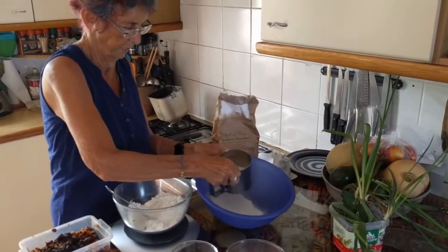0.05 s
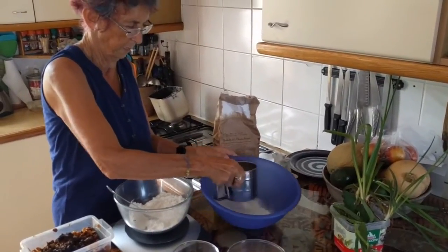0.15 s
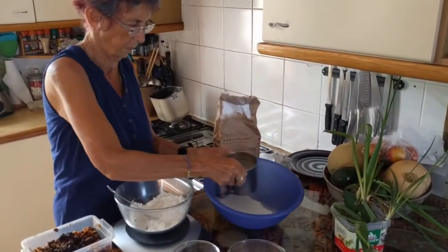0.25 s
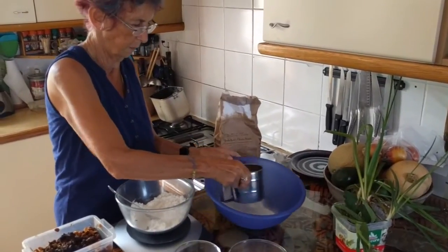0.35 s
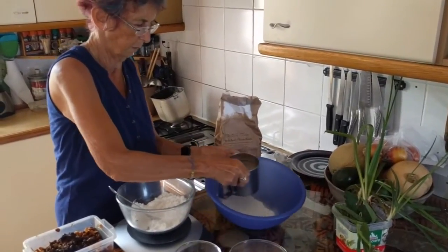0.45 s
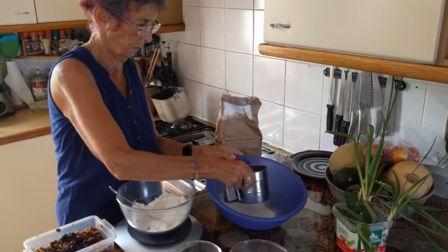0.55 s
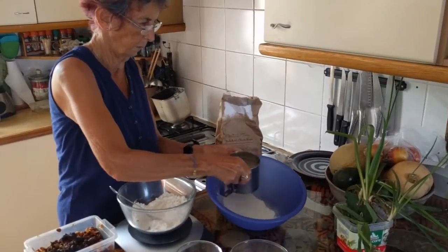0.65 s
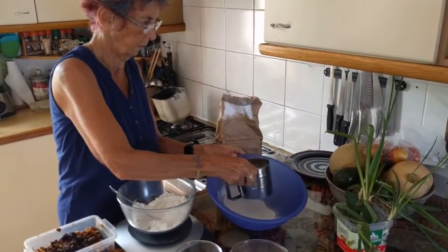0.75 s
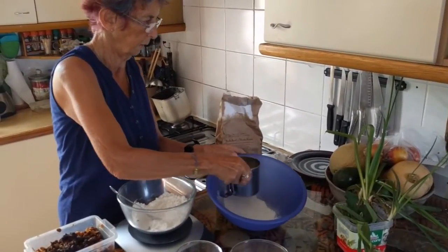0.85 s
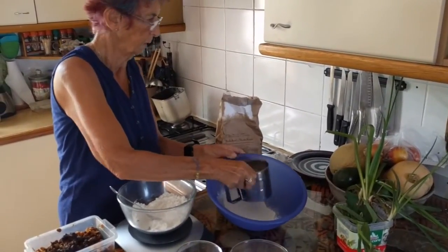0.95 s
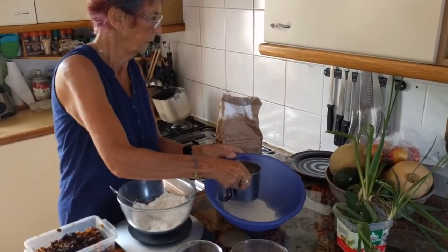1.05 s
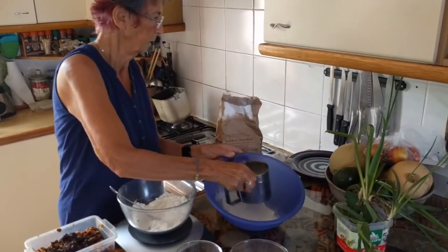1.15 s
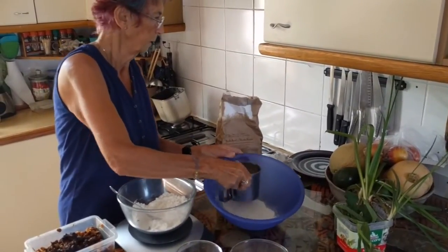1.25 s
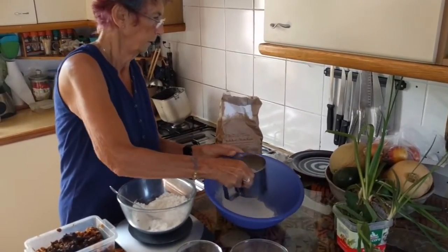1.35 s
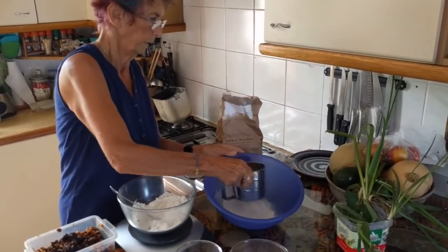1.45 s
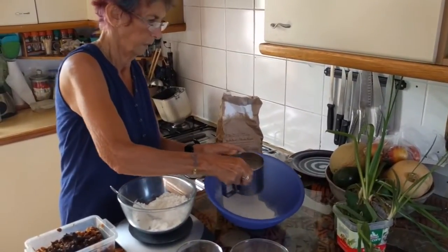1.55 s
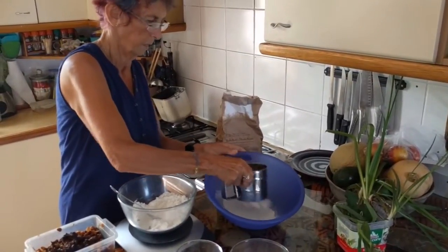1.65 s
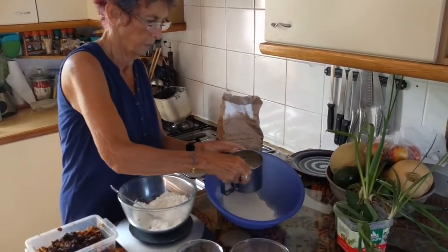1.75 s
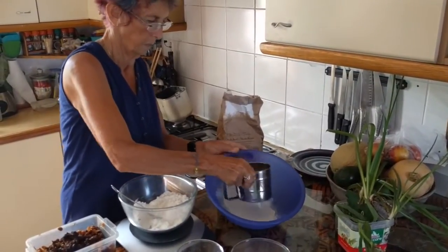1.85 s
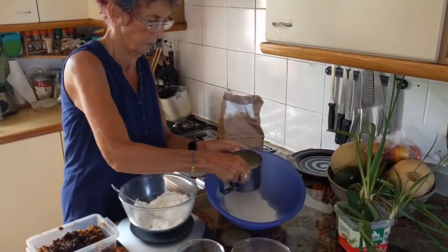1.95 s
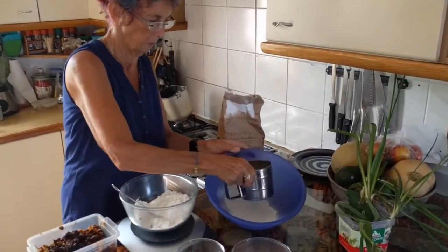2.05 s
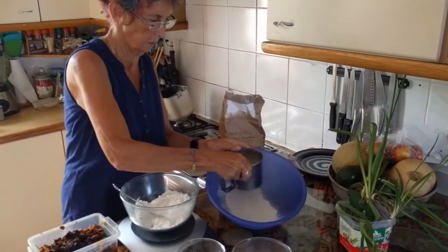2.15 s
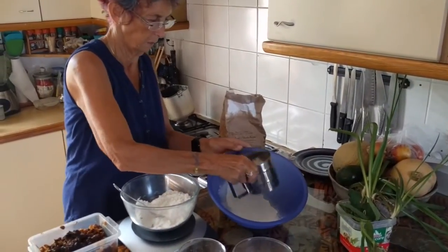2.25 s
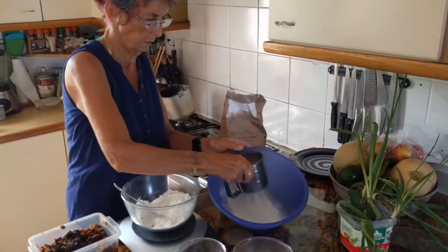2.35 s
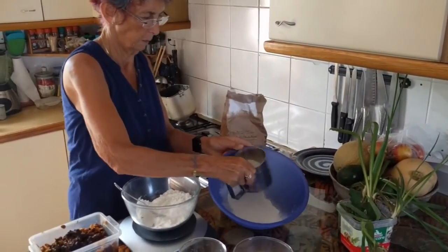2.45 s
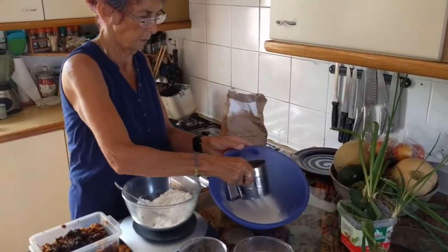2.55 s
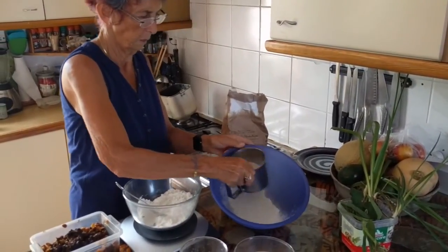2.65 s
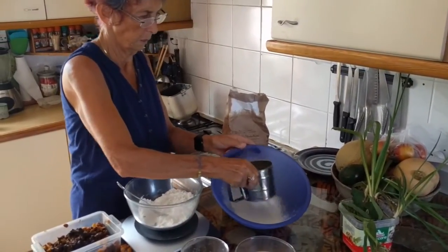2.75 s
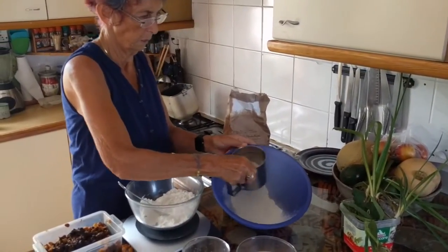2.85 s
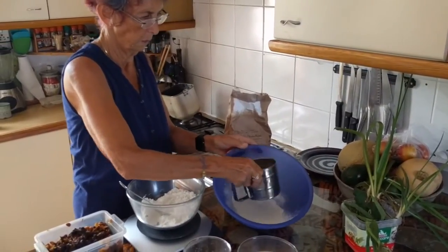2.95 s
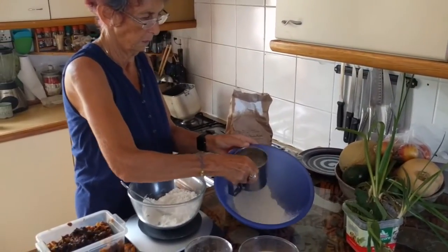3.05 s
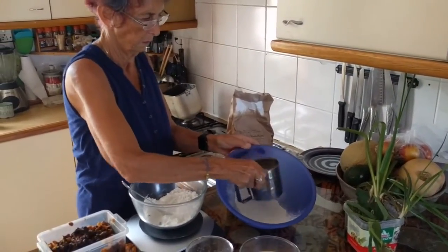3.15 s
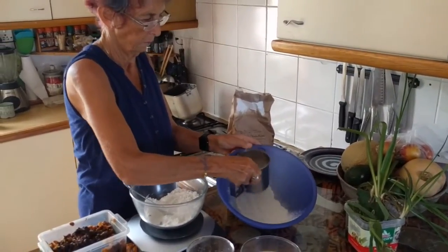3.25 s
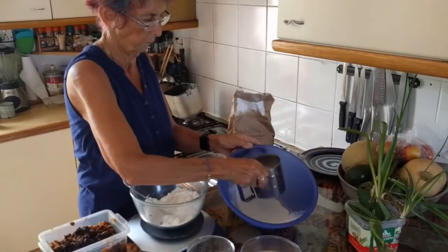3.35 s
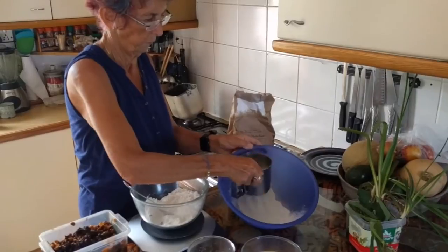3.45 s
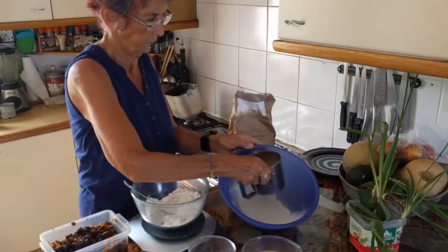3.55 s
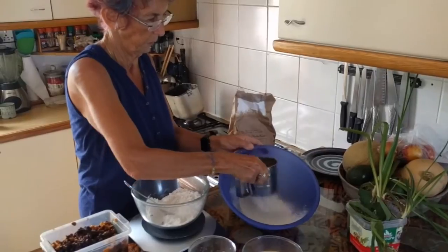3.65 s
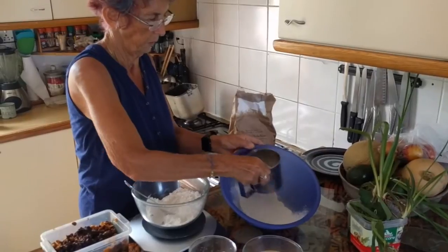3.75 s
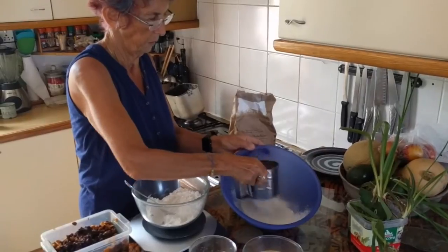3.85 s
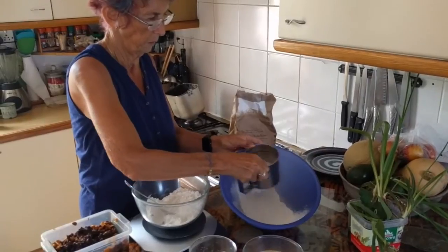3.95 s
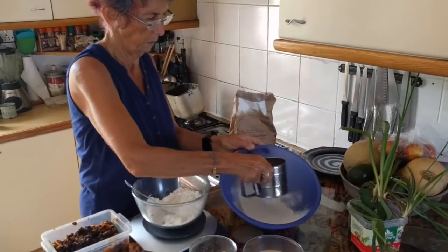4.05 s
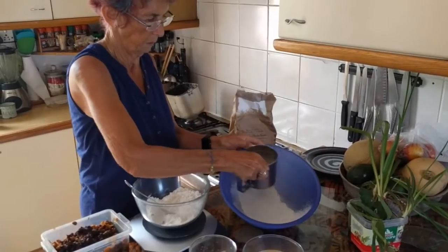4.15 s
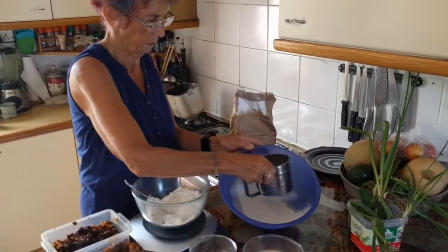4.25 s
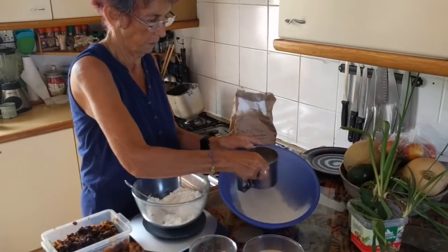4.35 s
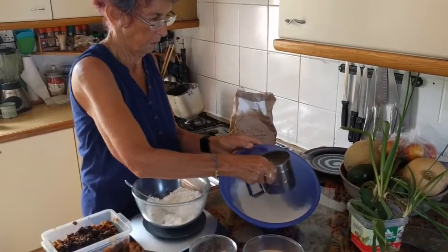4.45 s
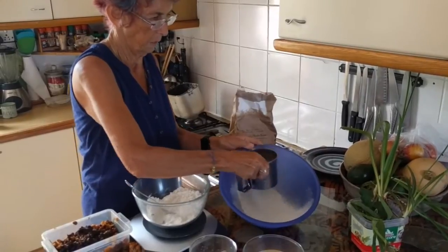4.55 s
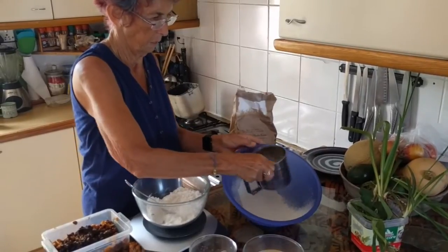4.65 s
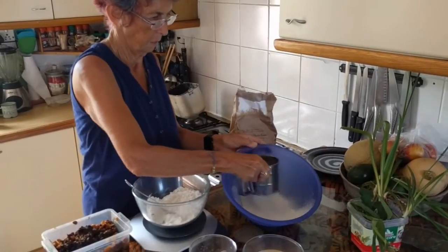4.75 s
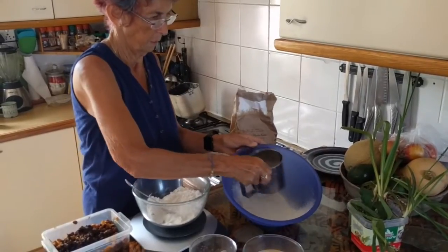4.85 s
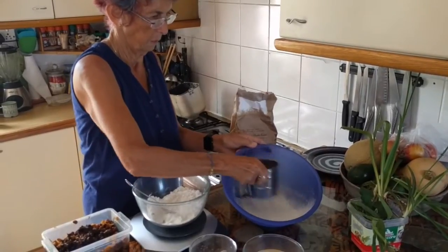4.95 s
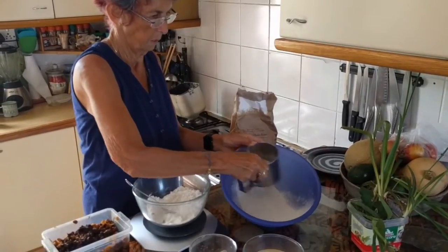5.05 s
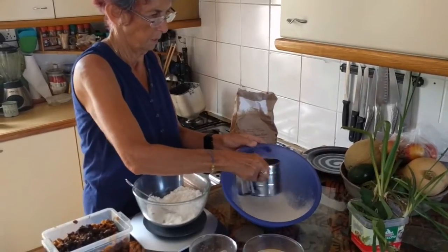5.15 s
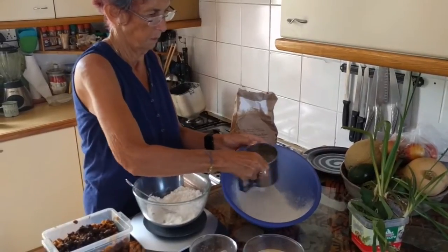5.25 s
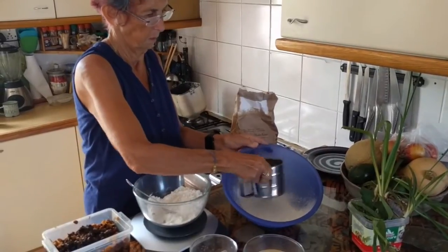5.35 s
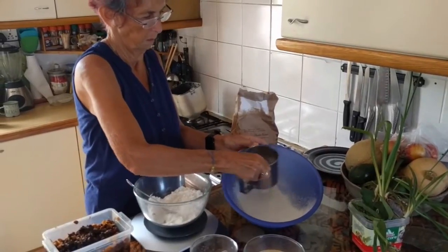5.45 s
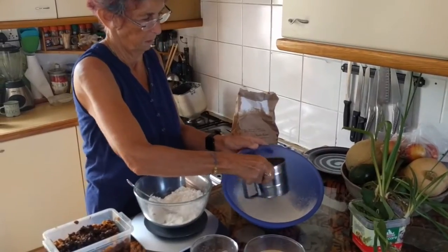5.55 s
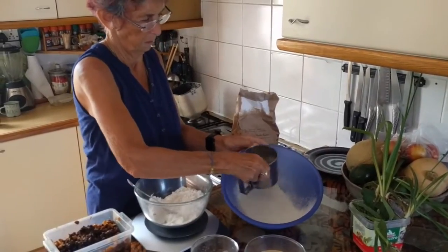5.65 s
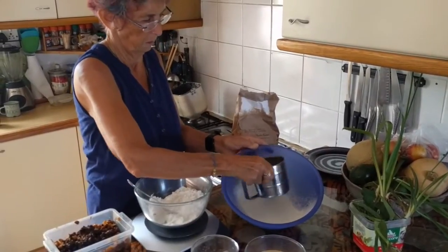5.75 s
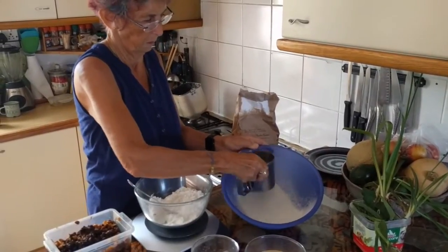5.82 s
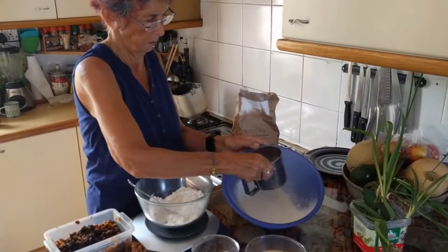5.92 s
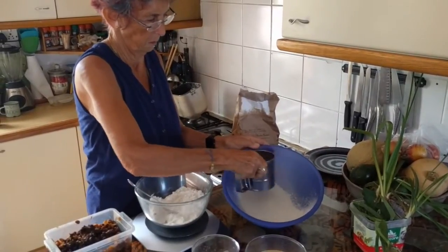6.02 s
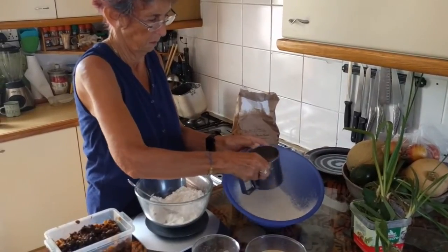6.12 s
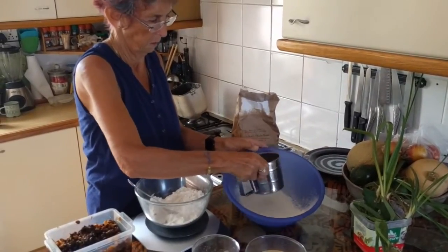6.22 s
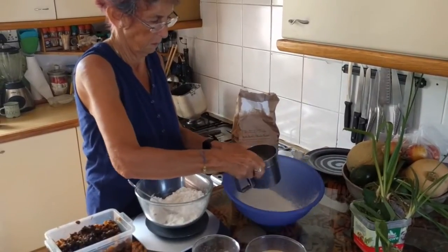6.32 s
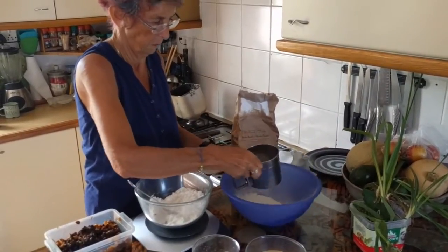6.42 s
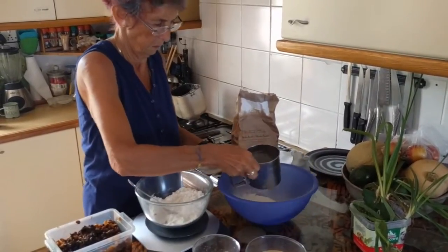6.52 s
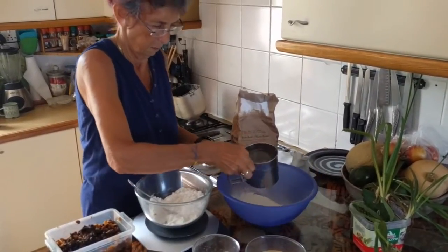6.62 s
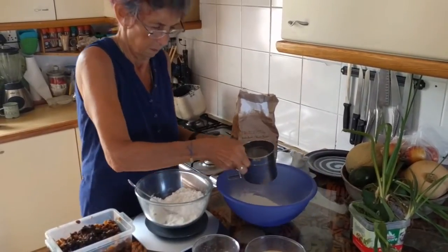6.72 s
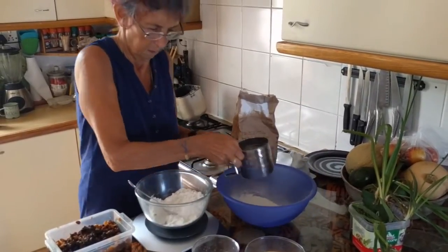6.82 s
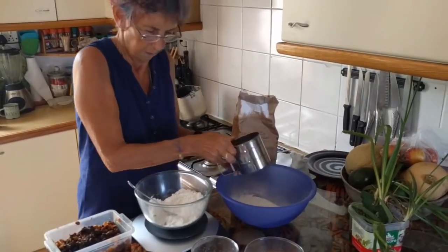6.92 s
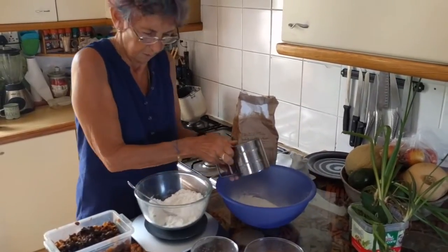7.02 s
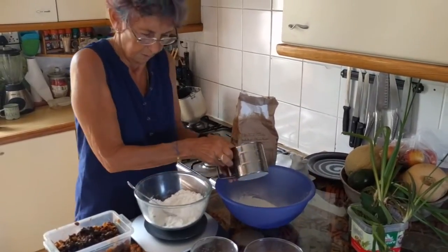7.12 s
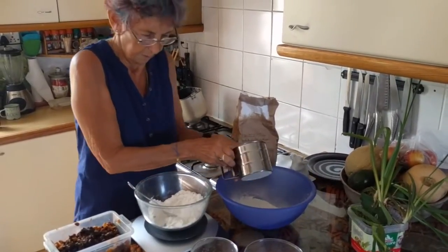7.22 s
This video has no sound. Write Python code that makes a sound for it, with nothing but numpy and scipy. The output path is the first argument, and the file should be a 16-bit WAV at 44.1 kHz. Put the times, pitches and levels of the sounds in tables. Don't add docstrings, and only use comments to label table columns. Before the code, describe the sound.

Rapid hollow clacks of a metal can against a plastic bowl in a tiled kitchen, ending with a set-down thud and light tinny taps.

```python
import sys
import numpy as np
from scipy import signal
from scipy.fft import rfft, irfft, next_fast_len
from scipy.io import wavfile
from scipy.ndimage import uniform_filter1d

SR = 44100
rng = np.random.default_rng(int(sys.argv[2]) if len(sys.argv) > 2 else 0)


def store_wav(level_fs):
    pcm = np.round(np.clip(np.atleast_2d(level_fs), -1, 1) * 32767)
    wavfile.write(sys.argv[1], SR, pcm.T.astype(np.int16))


def nominal_scale(level):
    x = np.asarray(level, float) / 20
    return 10 ** x


N = 321249


def at_hz(points, hz):
    return np.interp(np.log(hz), np.log(np.array(points)[:, 0]), np.array(points)[:, 1])


def band_pass(x, low_hz, high_hz):
    return signal.sosfilt(signal.butter(2, [low_hz, high_hz], "band", fs=SR, output="sos"), x)


def coloured(colour_db, channels):
    size = next_fast_len(N + SR)
    hz = np.maximum(np.fft.rfftfreq(size, 1 / SR), 10)
    spectrum = rfft(rng.standard_normal((channels, size))) * nominal_scale(colour_db(hz))
    noise = irfft(spectrum, size)[:, :N + SR]
    return noise / np.sqrt(np.mean(noise ** 2) + 1e-20)


def add(out, sound, s):
    at = sample(s)
    out[at:at + len(sound)] += sound[:len(out) - at]


def sample(s):
    return np.round((np.asarray(s) + 1) * SR).astype(int)


def struck(modes, spread_db, contact_s, scale_hz=1):
    mode, level_db, t60 = np.transpose(modes)[:, :, None]
    t = np.arange(SR // 8) / SR
    strength = nominal_scale(level_db + spread_db * rng.standard_normal(mode.shape))
    decay = nominal_scale(-60 * t / t60)
    rings = -np.sum(strength * decay * np.sin(2 * np.pi * mode * scale_hz * t), axis=0)
    rings = signal.lfilter(np.hanning(max(3, int(contact_s * SR) + 3)), 1, rings)
    return rings / np.abs(rings).max()


def snap(low_hz, high_hz, t60):
    t = np.arange(SR // 20) / SR
    burst = band_pass(rng.standard_normal(len(t)) * nominal_scale(-60 * t / t60), low_hz, high_hz)
    return burst / np.abs(burst).max()


# (frequency [Hz], level per Hz [dB])
FLOOR_SPECTRUM = [(25, -19), (55, 6.5), (85, -2), (130, -6), (230, -13), (400, -32), (700, -19),
                  (1000, -20), (1700, -26), (3000, -28), (5000, -30), (9000, -33.5), (16000, -27.5)]
# (time [s], level [dB])
FLOOR_LEVEL = [
    (0, -49.5),
    (5.5, -52.5),
    (6.1, -48),
    (7.28, -47.5),
]
# (frequency [Hz], rms level [dB])
HUM = [(51, -55.5), (67, -53)]


def background():
    level = nominal_scale(np.interp(np.arange(N) / SR, *np.transpose(FLOOR_LEVEL)))
    hum = sum(nominal_scale(level_db) * coloured(lambda hz: -9 * ((hz - tone_hz) / 5.7) ** 2, channels=1)
              for tone_hz, level_db in HUM)
    return level * coloured(lambda hz: at_hz(FLOOR_SPECTRUM, hz), channels=1)[0, SR:] + hum[0, SR:]


# (time [s], peak level [dB])
TICKS = [
    (1.0186, -32.5),
    (2.711, -40),
    (3.99, -36),
    (5.1736, -39),
    (6.3934, -40),
    (6.5516, -36),
    (7.0413, -35),
]


def timer_ticks():
    out = np.zeros(N + SR)
    beats = np.arange(.1482, N / SR, .3072)
    timer = list(zip(beats, -32.5 + 5.5 * rng.standard_normal(len(beats))))
    for s, peak_db in timer + TICKS:
        add(out, nominal_scale(peak_db + 5.5) * snap(low_hz=8400, high_hz=18400, t60=0.00043), s)
    return out


# (time [s], length [s], level [dB])
JINGLES = [
    (6.454, 0.027, -48.5),
    (6.871, 0.049, -47.5),
    (7.09, 0.066, -54),
]
# (frequency [Hz], level [dB], t60 [s])
WHISK = [(4160, -6, 0.028), (4770, -3, 0.031), (6400, -9, 0.025), (7800, -12, 0.017), (10500, 17, .01)]


def whisk():
    out = np.zeros(N + SR)
    for s, length, level_db in JINGLES:
        for share in rng.random(20):
            add(out, nominal_scale(level_db - 2) * struck(WHISK, spread_db=12, contact_s=0), s + share * length)
            rustle = snap(low_hz=5000, high_hz=17000, t60=0.075)
            add(out, nominal_scale(level_db + 2) * rustle, s + share * length)
    return out


# (time [s], force into bowl [dB], force into can [dB], sharpness of edge [dB])
KNOCKS = [(-0.012, -19, -25.5, -30.5), (0.2071, -20, -19.5, -28.5), (0.4087, -18.5, -20, -33.5),
          (0.6281, -19.5, -24.5, -33.5), (0.8386, -17.5, -19, -35), (1.0524, -19.5, -28.5, -32.5),
          (1.2659, -19.5, -29, -32), (1.4973, -16.5, -17.5, -29.5), (1.7111, -17.5, -19.5, -30.5),
          (1.9367, -19, -20.5, -33.5), (2.1509, -17, -18, -33.5), (2.3835, -18, -21, -36),
          (2.598, -18, -25, -34), (2.8212, -16.5, -17.5, -21), (3.0394, -17.5, -20, -29.5),
          (3.2449, -16.5, -19.5, -31), (3.4702, -17.7, -20, -29), (3.6885, -16, -19.5, -32.5),
          (3.89, -15, -17.5, -28), (4.1392, -19.5, -18.5, -26), (4.3376, -12, -18, -16.5),
          (4.5606, -14, -17, -31.5), (4.7934, -19, -20.5, -37), (4.987, -17.5, -22.5, -28),
          (5.2033, -17, -20, -25.5), (5.4133, -18, -19, -22), (5.6262, -15.5, -17.5, -24),
          (5.8344, -17.5, -18.5, -22)]
# (time [s], force into bowl [dB], force into can [dB], sharpness of edge [dB])
OTHER_KNOCKS = [
    (6.0142, -33, -20, -16.5),
    (6.428, -43, -43, -60),
    (6.5877, -20, -27.5, -47),
    (6.662, -29.5, -43, -67),
    (6.716, -30.5, -43, -52.5),
    (7.041, -40, -38.5, -43),
    (7.0758, -45, -32, -48),
]
# (time [s], frequency [Hz])
CAN_PITCH = [(0, 2050), (0.84, 1924), (1.27, 1700), (1.5, 1780), (2.6, 1720), (3.25, 1796), (3.9, 1750),
             (4.14, 1660), (4.5, 1730), (4.95, 1940), (5.4, 1860), (5.83, 2070), (6.015, 1510),
             (6.43, 2065), (7.05, 1690)]


def blows():
    s, bowl_db, can_db, edge_db = np.transpose(KNOCKS + OTHER_KNOCKS)
    clank_db = 1.113 * can_db + 0.42 * edge_db + 19
    can_hz = np.interp(s, *np.transpose(CAN_PITCH))
    return np.array([s, clank_db, bowl_db, can_db, can_hz, edge_db])


def flour_db(s, hz, middle_s=3):
    return -0.5 * (np.minimum(s, 6) - middle_s) * np.log2(hz / 400)


# (frequency [Hz], t60 [s])
KITCHEN_T60 = [(100, 0.19), (260, 0.58), (700, 0.47), (1800, 0.52), (5000, 0.49), (13000, 0.37)]
# (frequency [Hz], level per Hz [dB])
KITCHEN = [(70, -52), (130, -14), (220, -7.5), (450, -12), (800, -19), (1020, -20.5), (1300, -17.5),
           (1700, -14), (2200, -18), (3000, -22), (4000, -27.5), (6000, -27.5), (10000, -22.5),
           (16000, -34)]
# (frequency [Hz], width [Hz], level [dB])
LINGERING = [(134.5, 11.4, 15.5), (232.3, 30, 7), (382, 190, 5), (550, 67, 7.5), (743, 120, 9.5),
             (1490, 23, 6.5), (1607, 59, 7.5), (1862, 122, 10.5), (2158, 35, 6.5), (2400, 46, 4),
             (3380, 62, 6), (3840, 60, 6.5), (7340, 250, 5), (8100, 170, 9)]


def kitchen_colour(hz):
    peaks = [lift_db / (1 + (2 * (hz - at) / width) ** 2) for at, width, lift_db in LINGERING]
    return at_hz(KITCHEN, hz) + sum(peaks)


def kitchen():
    noise = coloured(kitchen_colour, channels=2)
    s, clank_db, bowl_db, can_db, can_hz, crack_db = blows()
    at, now = sample(s), np.arange(N + SR)
    last = np.maximum(np.searchsorted(at, now, "right") - 1, 0)
    since_blow = now - at[last] * (now >= at[0])
    same = .45
    thud_s, thud_db = np.transpose(THUDS)
    out, edges = 0, 70 * 2 ** (np.arange(17) / 2)
    for k, (low, high) in enumerate(zip(edges, np.minimum(edges[1:], 17000))):
        centre = np.sqrt(low * high)
        parts = [at_hz(list(zip([800, 1300, 2100, 3000, 4800, 7000], share)), centre) for share in np.eye(6)]
        blow_db = parts[0] * bowl_db + (parts[1] + parts[2]) * can_db
        blow_db += (parts[3] + parts[4]) * clank_db + parts[5] * crack_db
        tilt_db = 8.5 * np.log2(can_hz / 1800) * np.log2(centre / 1800)
        blow_db += (parts[1] + parts[2] + parts[3]) * tilt_db
        blow_db += parts[0] * flour_db(s, np.clip(centre, 250, 800))
        energy = np.full(N + SR, 1e-18)
        energy[at] = nominal_scale(2 * blow_db)
        energy[sample(thud_s)] = nominal_scale(2 * (thud_db + 1.5)) / (1 + (centre / 500) ** 4)
        dying = nominal_scale(-2 * 60 / (at_hz(KITCHEN_T60, centre) * SR))
        rising = np.exp(-1 / (SR * (0.00033 + 2.04 / centre)))
        envelope = np.sqrt(signal.lfilter([1 - rising], np.convolve([1, -dying], [1, -rising]), energy))
        band = band_pass(noise[k % 2], low, high)
        out = out + envelope * (np.sqrt(same) * band[since_blow + SR // 4] + np.sqrt(1 - same) * band)
    return out


def early_echoes(x):
    t = np.arange(SR // 2) / SR
    scatter = rng.standard_normal(len(t)) * nominal_scale(-60 * t / 0.69) * (1 - np.exp(-t / 0.027))
    return signal.fftconvolve(x, scatter)[:len(x)]


# (time [s], peak level [dB])
THUDS = [(0.041, -29.5), (0.447, -29.5), (0.659, -33.5), (0.871, -30), (1.082, -28), (1.293, -27),
         (1.534, -26), (1.744, -31), (2.628, -31), (3.279, -32), (3.923, -30.5), (4.358, -47), (4.594, -44),
         (5.02, -29), (5.451, -38), (5.662, -44), (6.053, -22.5), (6.111, -30), (6.281, -55), (6.436, -33),
         (6.598, -29), (6.665, -36), (6.727, -30.5), (7.227, -35.5)]
# (frequency [Hz], level [dB], t60 [s])
COUNTER = [(132, 3, 0.31), (222, -10.5, 0.055), (540, -11.5, 0.067)]


def counter_thuds():
    out = np.zeros(N + SR)
    for s, peak_db in THUDS:
        add(out, nominal_scale(peak_db) * struck(COUNTER, spread_db=-6.5, contact_s=0.0016), s)
    return out


# (time [s], peak level [dB])
SQUARE_BLOWS = [
    (4.338, 1),
    (6.015, -1),
]
# (time [s], peak level [dB])
BARE_BLOW = [
    (6.015, -3),
]
# (time [s], peak level [dB])
RIM_BUMPS = [
    (6.05, -20.5),
    (6.43, -33.5),
    (6.718, -28),
    (7.25, -42),
]
# (time [s], peak level [dB])
TIPPED_TAPS = [
    (7.04, -27),
    (7.0765, -20.5),
]
# (frequency [Hz], level [dB], t60 [s])
SHELL = [(1628, 0.5, 0.084), (1700, 11.5, 0.038), (2050, 5, .02)]
BARE_SHELL = [(900, -5, .03), (1450, -4, .025), (3550, 0, .012), (4050, -1, .012)]
FOOT = [(570, 2.5, 0.16), (696, 6.5, .045)]
EMPTY_CAN = [(622, -15, 0.19), (822, -7, 0.068), (1200, 3, 0.032), (1600, 2, 0.053)]


def square_blows_and_handling():
    out = np.zeros(N + SR)
    pairs = (SQUARE_BLOWS, SHELL), (BARE_BLOW, BARE_SHELL), (RIM_BUMPS, FOOT), (TIPPED_TAPS, EMPTY_CAN)
    for events, modes in pairs:
        for s, peak_db in events:
            add(out, nominal_scale(peak_db) * struck(modes, spread_db=1.5, contact_s=0), s)
    return out


def tipped_rattle():
    out = np.zeros(N + SR)
    for share in rng.random(30):
        s = 7.08 + share * (7.2 - 7.08)
        peak_db = -30.5 + share * (-51 + 30.5)
        hz = 1110 + share * (1050 - 1110)
        hollow = [(hz, 0, .03), (1.6 * hz, -6, .02)]
        add(out, nominal_scale(peak_db) * struck(hollow, spread_db=4, contact_s=0), s)
    return out


# (frequency [Hz], level re blow [dB], t60 [s])
LONG_BOWL = [(231.3, -16, 0.22), (351.6, -12, 0.13), (470, -35, 0.099), (572, -12, 0.13), (778, -14, 0.1)]
LONG_CAN = [(1444, -22.5, 0.34), (1646, -27, 0.39), (1720, -16, 0.34), (1718, -15, 0.12),
            (2067, -6.5, 0.08), (2150, -31, 0.14), (2445, -32, 0.87), (2830, -18, 0.067), (3250, -33, 0.26),
            (3830, -22, 0.13)]


def long_rings():
    s, clank_db, bowl_db, can_db, can_hz, crack_db = blows()
    out = np.zeros(N + SR)
    for modes, blow_db in ((LONG_BOWL, bowl_db), (LONG_CAN, can_db)):
        for hz, level_db, t60 in modes:
            near_db = 0.5 * (np.exp(-(np.log2(hz / can_hz) / 0.26) ** 2) - 4.05)
            drive_db = blow_db + level_db + near_db + (hz < 1000) * flour_db(s, hz, middle_s=4.5)
            clicks = np.full(N + SR, 1e-18)
            clicks[sample(s)] = nominal_scale(drive_db + 2 * rng.standard_normal(len(s)))
            r, w = nominal_scale(-60 / (t60 * SR)), 2 * np.pi * hz / SR
            out += signal.lfilter([0, -np.sin(w)], [1, -2 * r * np.cos(w), r * r], clicks)
    return out


# (frequency [Hz], level [dB], t60 [s])
BOWL = [(130, -11, 0.068), (240, -4, 0.13), (266, -15, 0.014), (368, 1.5, 0.03), (425, 2, 0.018),
        (524, -0.5, 0.033), (600, 0, 0.029), (772.4, -10.5, 0.083), (1026, -7, 0.038), (1115, -24, 0.069)]
CLANK = [(2350, 17, 0.021), (2880, 27.5, 0.0069), (3164, 12.5, 0.032), (3470, 14.5, 0.013),
         (3720, -1, 0.08), (4480, -34, 0.0063), (4460, -60, 0.014), (5440, 15.5, 0.017)]
# (frequency [multiple of can pitch], level [dB], t60 [s])
CAN = [(.83, -10, .03), (1., 0, .035), (1.13, -8, .025), (1.27, -11, .02)]


def sifter_on_bowl():
    out = np.zeros(N + SR)
    for s, clank_db, bowl_db, can_db, can_hz, crack_db in blows().T:
        filled = [(hz, db + flour_db(s, hz), t60) for hz, db, t60 in BOWL]
        add(out, nominal_scale(bowl_db + 6.0) * struck(filled, spread_db=2, contact_s=0.0005), s)
        can = nominal_scale(can_db + 4.5) * struck(CAN, spread_db=3.0, contact_s=.0001, scale_hz=can_hz)
        can += nominal_scale(clank_db - 1.0) * struck(CLANK, spread_db=9.0, contact_s=0)
        add(out, can, s)
        add(out, nominal_scale(-20.0) * can, s + 0.002765)
        add(out, nominal_scale(can_db) * snap(low_hz=0.84 * can_hz, high_hz=1.576 * can_hz, t60=0.045), s)
        add(out, nominal_scale(clank_db - 5) * snap(low_hz=2300, high_hz=5540, t60=0.026), s)
        add(out, nominal_scale(crack_db - 1.5) * snap(low_hz=4700, high_hz=14800, t60=0.09), s)
        add(out, nominal_scale(crack_db + 5.5) * snap(low_hz=2540, high_hz=15300, t60=0.007), s)
    return out


def scene():
    small = timer_ticks() + whisk()
    knocks = counter_thuds() + square_blows_and_handling() + tipped_rattle() + long_rings() + sifter_on_bowl()
    knocks = signal.sosfilt(signal.butter(3, 125, "high", fs=SR, output="sos"), knocks)
    echoes = early_echoes(knocks + nominal_scale(6.0) * small)
    near = knocks + small + nominal_scale(-46.0) * echoes + nominal_scale(-9.5) * kitchen()
    return (near[SR:] + background())[None]


def roll_off(x):
    return signal.sosfilt(signal.butter(12, 16670, fs=SR, output="sos"), x)


def record(dry):
    limit_db, sense_s = -10.5, .001
    release_db_per_s, lag_s, attack_s = 280, .0065, .0012
    top = .68
    x = signal.sosfilt(signal.butter(3, 44, "high", fs=SR, output="sos"), dry)
    sensed = uniform_filter1d(np.abs(x[0]), size=int(sense_s * SR) + 1)
    over_db = np.maximum(20 * np.log10(sensed + 1e-9) - limit_db, 0)
    slope = release_db_per_s * np.arange(N) / SR
    held_db = np.maximum.accumulate(over_db + slope) - slope
    late_db = np.interp(np.arange(N) - lag_s * SR, np.arange(N), np.maximum(held_db, 0))
    r = np.exp(-1 / (attack_s * SR))
    duck_db = signal.lfilter([1 - r], [1, -r], late_db)
    x = np.clip(x * nominal_scale(-duck_db), -top, top)
    x = signal.sosfilt(signal.cheby2(8, 50, 16900, fs=SR, output="sos"), x)
    return roll_off(x)


dry = scene()
out = record(dry)
store_wav(out)
```